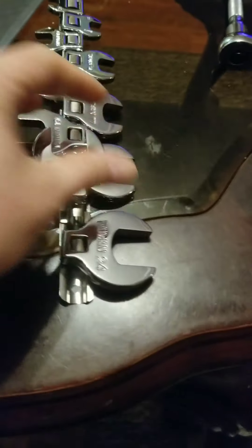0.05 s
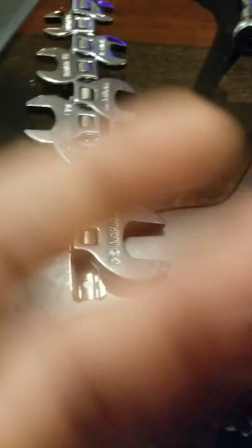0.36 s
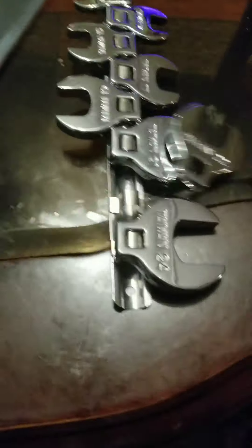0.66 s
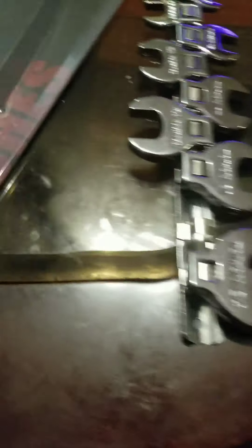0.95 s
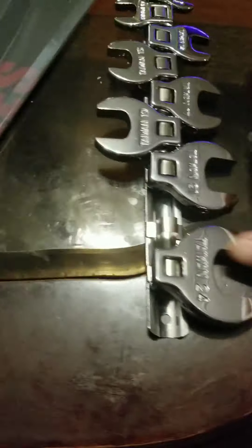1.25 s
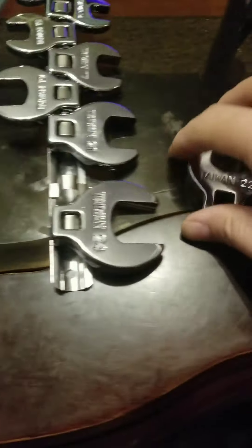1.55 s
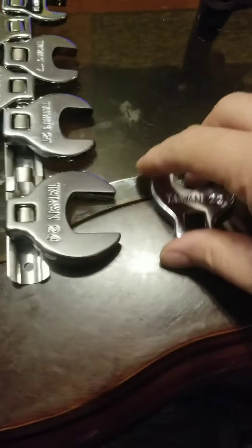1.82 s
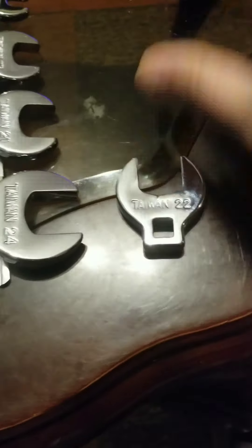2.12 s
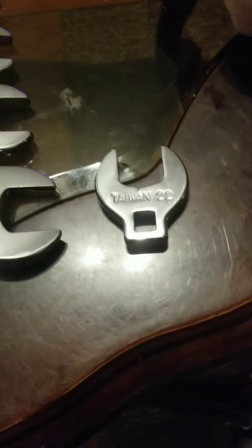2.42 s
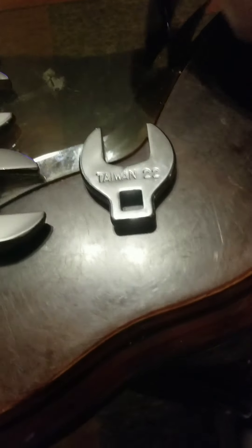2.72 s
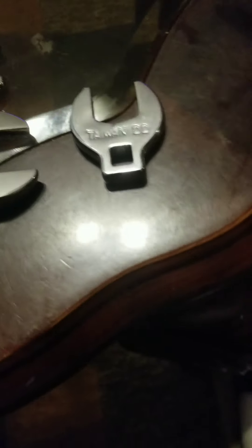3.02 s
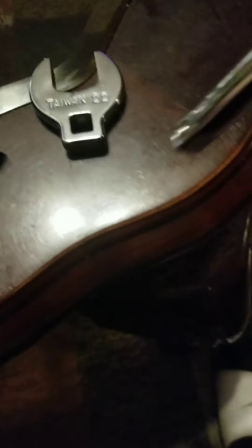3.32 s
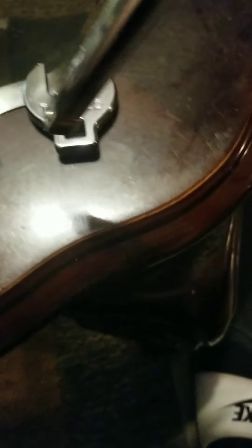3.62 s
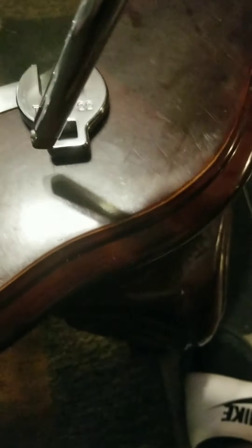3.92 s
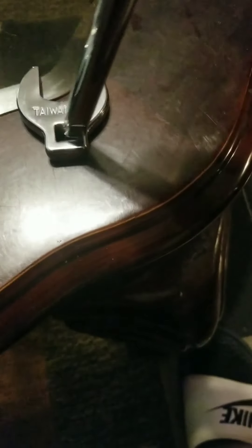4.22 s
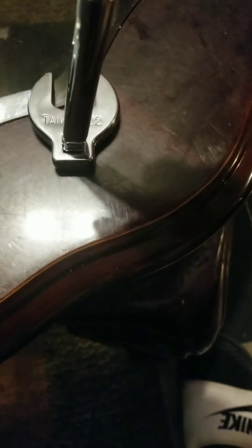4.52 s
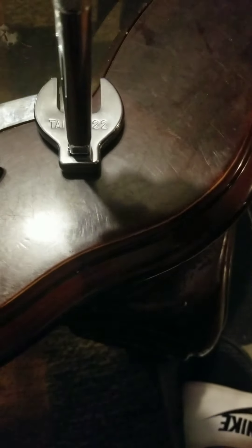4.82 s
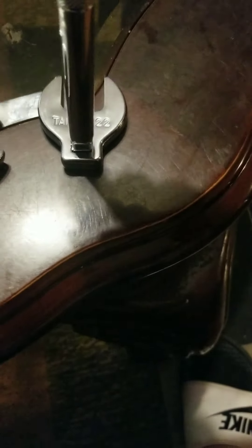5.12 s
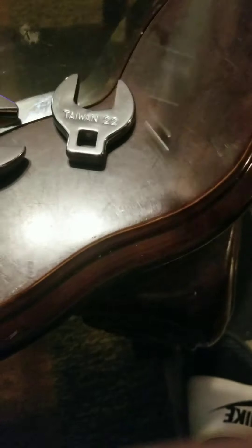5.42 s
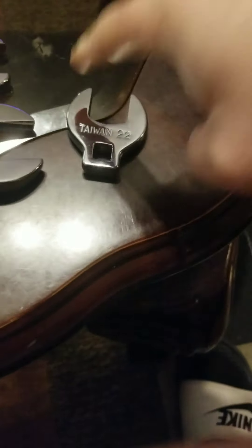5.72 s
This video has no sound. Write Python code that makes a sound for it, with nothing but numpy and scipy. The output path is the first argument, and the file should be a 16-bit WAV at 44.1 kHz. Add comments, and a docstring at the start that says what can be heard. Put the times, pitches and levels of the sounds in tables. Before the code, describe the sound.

A steel wrench clinks against others on a rack, then tumbles onto a wooden table with a quick, ringing clatter. Soft ticks follow as it is nudged into place. A drive handle meets its square hole with a cluster of sharp clacks and snaps, then comes out with two more clacks and a faint hiss. The sounds are close, in a small room with a short echo and a low hum.

```python
"""Steel crowfoot wrenches clink and clatter on a wooden table in a small room.
One clinks against the rack, tumbles onto the table and is nudged into place. A drive handle is
pushed into its square hole with sharp clacks, then pulled out with a faint hiss and squeak.
Hard hits shake steel and wood together and leave the steel ringing; light touches only tick.
The room adds a short echo, dull air noise and the low hum of a motor."""
import sys
import numpy as np
from scipy import signal
from scipy.fft import rfft, irfft, next_fast_len
from scipy.io import wavfile

SR = 44100
rng = np.random.default_rng(int(sys.argv[2]) if len(sys.argv) > 2 else 0)


def put_to_file(sound):
    """Save the sound as 16-bit audio at rate SR, in the file named by the first command-line argument."""
    columns = np.atleast_2d(sound).T  # one column per channel
    safe = np.clip(columns, -1, 1)
    whole_steps = np.round(safe * 32767)
    wavfile.write(sys.argv[1], SR, whole_steps.astype(np.int16))


N = 254016
TIME = np.arange(N) / SR
HIT_SAMPLES = 16384
HIT_TIME, HIT_HZ = np.arange(HIT_SAMPLES) / SR, np.fft.rfftfreq(HIT_SAMPLES, 1 / SR)
SIDES = np.array([[.5], [-.5]])   # splits a left-right difference between the ears


# wrench hits wrench: start_s, level_db, treble_db_per_octave, chatter_s, ring_db, neighbour_ring_db
CLINKS = [(.0045, -25, 1.5, .012, -19, -49.5), (.454, -49.5, -4, .007, -65.5, -70.5),
          (.5385, -37, -3.5, .004, -49.5, -52), (0.5473, -35.5, -.5, .01, -37, -36),
          (.570, -38.5, 9, .007, -41, -40.5)]
# tone of a clink, from bass to treble: pitch_hz, level_db
CLINK_TONE = [(100, -11), (300, -6), (1200, 0.5), (2200, -6.5), (5000, -12.5), (8800, -7.5), (10000, -3),
              (11000, -2.5), (12000, 7), (13000, -7), (14200, -11.5), (15600, -9.5)]
# pitches that stand out in loose steel: pitch_hz, width_hz, full_boost_db
LOOSE_STEEL = [(1066, 72, 3.5), (1560, 32, 5.5), (2210, 21, 8.5), (2380, 30, 8), (2890, 45, 10),
               (3560, 36, 10), (4410, 71, 11), (4670, 20, 5.5), (4760, 19, 2.5), (5530, 69, 9.5),
               (6360, 40, 7), (6400, 35, 5), (7540, 84, -0.5), (8540, 70, 5), (11000, 50, 6.5),
               (11810, 56, 5), (12900, 50, 5), (13200, 50, 7), (13340, 70, 2), (15100, 50, 5.5)]
# notes of the neighbouring wrench: pitch_hz, level_db, fade_s
NEIGHBOUR_NOTES = [(7460, -19.5, 0.17), (10500, -12, 0.29), (11850, 3.5, 0.15), (12350, -11, 0.095),
                   (14710, -4, .2), (15420, -15.5, .12)]

def clinks():
    """The wrench knocks against its neighbour on the rack, and both ring."""
    hits = steel_hits(CLINKS, CLINK_TONE, LOOSE_STEEL, boost_share=0.79, damping=0.95,
                      crack_db=-1.5, pan_db=-1.5, ring_pan_db=4.0, vary_db=0.5)
    return hits + pings([(s, ring_db) for s, *_, ring_db in CLINKS], NEIGHBOUR_NOTES)


# four bounces on the table: start_s, level_db, first_rattle_db
BOUNCES = [(.6773, -17.5, -27), (.7395, -19.5, -24), (.7906, -22, -29), (.8404, -24, -28.5)]
# tone of a bounce: pitch_hz, level_db
BOUNCE_TONE = [(80, -20), (250, -3), (420, -9), (700, -1.5), (1000, -2.5), (2000, -3.5), (4500, -2),
               (6500, -3), (8000, -5), (9000, -11), (12000, -9), (15000, -9), (16000, -19)]
# notes of the rack: pitch_hz, level_db, base_fade_s
RACK_NOTES = [(1502, -12, 0.11), (2250, -9.5, 0.2), (3410, -8.5, 0.12), (3500, -1.5, 0.11), (4270, -5, .16),
              (4800, -4.5, .17), (5400, -6, .22), (6530, -5, .18)]

def tumble(chatter_s=.018, rattle_gap_s=0.016, rattle_chatter_s=.013):
    """The wrench bounces, each time more briefly. A dying rattle follows each bounce."""
    touches = []
    for n, (s, db, rattle_db) in enumerate(BOUNCES):
        touches.append((s, db, 0.06 * n, chatter_s * .68 ** n))   # a little brighter each time
        for k in range(4):   # each rattle is 5 dB softer than the last
            touches.append((s + rattle_gap_s * (k + 1), rattle_db - 5 * k, 0.2, rattle_chatter_s))
    # the wrench rings 13 dB below each touch, its neighbour 21 dB below, the rack 15 dB below
    rows = [(s, db, treble, chatter, db - 13, db - 21) for s, db, treble, chatter in touches]
    hits = steel_hits(rows, BOUNCE_TONE, LOOSE_STEEL, boost_share=0.84, damping=1.3,
                      crack_db=-1.5, pan_db=0.5, ring_pan_db=2.5, vary_db=3.0)
    rack = pings([(s, db - 15) for s, db, *_ in rows], RACK_NOTES, damping=1.1)
    neighbour = pings([(s, ring_db) for s, *_, ring_db in rows], NEIGHBOUR_NOTES)
    return hits + rack + neighbour


# handle hits wrench: start_s, level_db, treble_db_per_octave, chatter_s, ring_db, handle_ring_db
CLACKS = [(4.2045, -19, 0.8, 0.014, -26.5, -37), (4.246, -26.5, 2.4, 0.0085, -43, -50),
          (4.3252, -20.5, 1.3, 0.012, -24, -26.5), (4.3485, -27.5, -3.5, 0.003, -48, -52),
          (4.366, -25.5, 0.5, 0.0017, -55, -58), (4.371, -22.5, 3, 0.0075, -45, -48),
          (4.396, -28, 1.5, 0.0053, -57, -50), (5.143, -22, 1.1, 0.019, -45, -35.5),
          (5.232, -28, 5, 0.0039, -40, -50)]
# tone of a clack: pitch_hz, level_db
CLACK_TONE = [(80, -9), (200, -11), (320, 4), (600, -1), (1500, -0.5), (2200, -9.5), (3500, -15.5),
              (5000, -18.5), (7000, -22.5), (10000, -30.5), (13000, -35), (16000, -70)]
# pitches that stand out in steel pressed on wood: pitch_hz, width_hz, full_boost_db
PRESSED_STEEL = [(375, 30, 3.7), (431, 43, 9), (757, 48, 7.5), (1000, 73, 5.2), (1173, 49, 8.9),
                 (1570, 78, 4), (2296, 120, 6.4), (2930, 130, 12.2), (3595, 59, 15.2), (4380, 72, 12.5),
                 (6500, 190, 0.94)]
# notes of the drive handle: pitch_hz, level_db, base_fade_s
HANDLE_NOTES = [(8580, -5, 0.2), (10880, -15, 0.19), (12500, -9, 0.1), (14400, -20, .08), (15400, -22, .1)]

def handle_clacks(crack_low_hz=5000):
    """The handle meets the square hole and rocks the wrench on the wood."""
    out = steel_hits(CLACKS, CLACK_TONE, PRESSED_STEEL, boost_share=1.0, damping=2.5,
                     crack_db=2.5, pan_db=0.8, ring_pan_db=14.5, vary_db=3.0)
    out += pings([(s, ring_db) for s, *_, ring_db in CLACKS], HANDLE_NOTES, damping=0.8)
    # bare steel on steel adds a short, bright crack that grows with the ringing
    treble = 1 / np.sqrt(1 + (crack_low_hz / (HIT_HZ + 20)) ** 4)
    for s, *_, ring_db, handle_ring_db in CLACKS:
        strength = from_db(ring_db - 27) + from_db(handle_ring_db - 9)
        add(out, s, strength * knock(treble, chatter_s=.0009, crack_db=0, vary_db=4.0))
    return out


# notes of the wrench being handled: pitch_hz, level_db, base_fade_s
WRENCH_NOTES = [(2890, -20, .2), (9860, -0.5, 0.22), (9670, -8.5, 0.045), (11930, -21.5, 0.13),
                (15340, -18, .14)]

def steel_hits(rows, tone, peaks, boost_share, damping, crack_db, pan_db, ring_pan_db, vary_db):
    """Each hit shakes steel and table together and leaves the wrench ringing. Positive pan is left."""
    out = np.zeros((2, N))
    body = tone_curve(tone, [(hz, width, db * boost_share) for hz, width, db in peaks], HIT_HZ)
    octaves = np.log2(np.maximum(HIT_HZ, 300) / 300)
    for s, db, treble_db, chatter_s, ring_db, _ in rows:
        thud = knock(body * from_db(treble_db * octaves), chatter_s, crack_db, vary_db)
        ring = ringing(WRENCH_NOTES, vary_db=0.0, damping=damping)
        add(out, s, from_db(db + pan_db * SIDES) * thud)
        add(out, s, from_db(ring_db + ring_pan_db * SIDES) * ring)
    return out


# snaps of the locking ball: start_s, level_db
SNAPS = [(4.326, -21), (4.3485, -23), (5.232, -22)]
# notes of a snap: pitch_hz, level_db, fade_s
SNAP_NOTES = [(3580, -1.5, 0.037), (5300, -8.5, 0.053), (5860, -3, 0.016), (6830, -12, 0.022),
              (7680, -11, 0.031)]

def ball_snaps():
    """The spring-loaded ball in the handle snaps and rings briefly."""
    return pings(SNAPS, SNAP_NOTES)


# light touches on the table: start_s, level_db, lowest_hz, highest_hz
NUDGES = [(1.362, -52, 2490, 5900), (1.3905, -44.5, 1700, 4000), (1.425, -44, 2100, 11900),
          (1.4875, -47.5, 2010, 14000), (1.512, -46, 507, 3560), (1.5415, -41, 396, 3700),
          (1.670, -44.5, 600, 13900), (2.487, -47.5, 700, 6800), (2.536, -51, 910, 5060),
          (2.589, -39.5, 1740, 11900), (2.654, -50, 500, 4500), (2.782, -54.5, 2000, 13000),
          (4.576, -40.5, 400, 2420)]
# tone of a light touch: pitch_hz, level_db
NUDGE_TONE = [(100, -23), (400, 8.5), (1000, 10.5), (1900, -2), (2800, 1), (4200, -5), (6000, -6.5),
              (9000, -12.5), (13000, -16), (16000, -16)]

def nudges(pan_db=-1.0, tick_hz=3680, tick_width_hz=160, tick_db=6, boost_share=0.28):
    """Fingers slide the wrench into place and stop it ringing, so it only ticks."""
    out = np.zeros((2, N))
    peaks = [(hz, width, db * boost_share) for hz, width, db in PRESSED_STEEL]
    body = tone_curve(NUDGE_TONE, [(tick_hz, tick_width_hz, tick_db)] + peaks, HIT_HZ)
    for s, db, low_hz, high_hz in NUDGES:
        band = 1 / np.sqrt((1 + (low_hz / (HIT_HZ + 20)) ** 4) * (1 + (HIT_HZ / high_hz) ** 8))
        tick = knock(body * band, chatter_s=0.0058, crack_db=-0.5, vary_db=1.0)
        add(out, s, from_db(db + pan_db * SIDES) * tick)
    return out


# tiny slips: start_s, level_db
SLIPS = [(2.968, -56), (2.993, -60), (5.592, -46)]
# notes of a squeak: pitch_hz, level_db, fade_s
SQUEAK_NOTES = [(6480, 7.5, .02), (6800, 1, .02), (6850, -8, .02)]

def squeaks():
    """Steel slips for an instant and gives a high squeak."""
    return pings(SLIPS, SQUEAK_NOTES)


# faint brushing strokes: middle_s, half_length_s, level_db
BRUSHES = [(5.45, 0.034, -50), (5.54, 0.022, -44), (5.556, 0.0085, -38.5)]

def brushing(low_hz=12000, body_db=-11):
    """A thin hiss as the handle is drawn away."""
    noise = rng.standard_normal((2, N))
    hiss = signal.sosfilt(signal.butter(2, low_hz, "high", fs=SR, output="sos"), noise)
    strokes = sum(from_db(db) * np.exp(-((TIME - s) / half_s) ** 2) for s, half_s, db in BRUSHES)
    return rms_one(hiss + from_db(body_db) * noise) * strokes


def pings(rows, notes, damping=1):
    """Ringing without a knock, once for each (start_s, level_db)."""
    out = np.zeros((2, N))
    for s, db in rows:
        add(out, s, from_db(db) * ringing(notes, vary_db=0.5, damping=damping))
    return out


def ringing(notes, vary_db, damping, detune=0.0034):
    """Steel rings. Each note falls 60 dB in its fade time divided by damping (pressure on the steel)."""
    out = np.zeros((2, HIT_SAMPLES))
    for hz, db, fade_s in notes:
        shifted_hz = hz * (1 + detune * rng.standard_normal())   # each touch bends the pitch a little
        phase = rng.uniform(0, 2 * np.pi) + np.pi / 2 * SIDES
        level_db = db + vary_db * rng.standard_normal((2, 1)) - 60 * HIT_TIME * damping / fade_s
        out += from_db(level_db) * np.sin(2 * np.pi * shifted_hz * HIT_TIME + phase)
    return out * (1 - np.exp(-HIT_TIME * SR / 10))


def contact_force(chatter_s, crack_db, crack_s=0.00041, uneven_db=1.5):
    """The push of a hit: a hard first crack, then a dying chatter of tiny, uneven bounces."""
    steps = np.arange(0, HIT_SAMPLES, SR // 1000)
    wobble = np.interp(np.arange(HIT_SAMPLES), steps, rng.standard_normal(len(steps)))
    bounces = from_db(uneven_db * wobble) * np.exp(-HIT_TIME / chatter_s)
    chatter = rms_one(rng.standard_normal((2, HIT_SAMPLES)) * bounces)
    crack = rms_one(rng.standard_normal((2, HIT_SAMPLES)) * np.exp(-HIT_TIME / crack_s))
    rise = 1 - np.exp(-HIT_TIME / 0.0015)   # the faces take a moment to meet fully
    return rms_one((chatter + from_db(crack_db) * crack) * rise) / np.sqrt(HIT_SAMPLES)


# how alike a hit is in both ears: pitch_hz, likeness (1 = the same, 0 = unrelated)
HIT_LIKENESS = [(150, 1), (400, 0.41), (1000, 0.044), (2500, 0.1), (6000, 0.062), (15000, 0.1)]

def knock(body, chatter_s, crack_db, vary_db, right_delay_s=0.000449):
    """A push shakes an object. Each spot struck favours other pitches; the left ear hears it first."""
    steps_hz = np.linspace(0, np.sqrt(SR / 2), 70) ** 2
    spot = from_db(vary_db * np.interp(HIT_HZ, steps_hz, rng.standard_normal(len(steps_hz))))
    delay = np.exp(2j * np.pi * HIT_HZ * right_delay_s * (SIDES - .5))
    force = two_ears(rfft(contact_force(chatter_s, crack_db)), HIT_LIKENESS, HIT_HZ) * delay
    fade = np.minimum(np.linspace(4, 0, HIT_SAMPLES), 1) ** 2
    sound = irfft(force * ring_after(body * spot)) * fade
    return rms_one(sound) * np.sqrt(.025 * SR / HIT_SAMPLES)   # as much energy as 25 ms at level 1


# time the echo takes to fall 60 dB: pitch_hz, fade_s
ECHO_FADE = [(150, 0.13), (1000, 0.36), (4000, 0.41), (8000, 0.33), (15000, 0.2)]
# strength of the echo: pitch_hz, level_db
ECHO_LEVEL = [(150, -8), (1000, -5.5), (4000, -7), (8000, -7.5), (15000, -10)]
# how alike echo and air noise are in both ears: pitch_hz, likeness
ROOM_LIKENESS = [(60, 0.93), (150, 0.92), (300, 1), (500, -0.13), (950, -0.14), (2400, 0.15), (6000, -0.38),
                 (15000, 0.96)]

def room_echo(sound, build_s=0.004):
    """Reflections build up quickly and die soonest in the bass and the highest treble."""
    t = np.arange(SR * 3 // 4) / SR
    edges_hz = 80 * 2 ** np.arange(9.0)
    tail = 0
    for low, high in zip(edges_hz, edges_hz[1:]):
        hz = np.sqrt(low * high)
        octave = signal.butter(2, [low, high], "band", fs=SR, output="sos")
        band = two_ears(signal.sosfilt(octave, rng.standard_normal((2, len(t)))), ROOM_LIKENESS, hz)
        fade = from_db(-60 * t / at_hz(ECHO_FADE, hz)) * (1 - np.exp(-(t / build_s) ** 2))
        tail += from_db(at_hz(ECHO_LEVEL, hz)) * band * fade / np.sqrt(np.sum(fade ** 2))
    return signal.fftconvolve(sound, tail, axes=1)[:, :N]


# rise and fall of the background: time_s, relative_level_db
BACKGROUND_SWELL = [(0.0, -39), (0.34, -46), (0.74, -42), (0.9, -52.5), (1.11, -55.5), (1.59, -52),
                    (1.92, -55.5), (2.39, -50.5), (2.95, -51), (3.26, -48), (3.51, -43.5), (4.3, -36.5),
                    (4.59, -40.5), (5.76, -39.5)]
# tone of the air noise: pitch_hz, level_db
AIR_TONE = [(20, -34), (40, -16.5), (55, -24), (80, -12), (114, -6.5), (160, -6), (256, -6.5), (400, -12),
            (545, -14.5), (700, -9), (1290, -22), (3000, -28.5), (7700, -36.5), (10100, -44), (16000, -39)]
# pitches the room colours: pitch_hz, width_hz, boost_db
ROOM_PEAKS = [(122, 17, 2.5), (227, 8.6, -0.5), (258.5, 19, 6.5), (321.7, 13, 10), (411, 42, 4)]

def background(hum_hz=58.4, hum_db=-8, gain_db=1.0, pan_db=-0.5):
    """Dull air noise and a motor's hum; both sink after the tumble and slowly swell again."""
    hz = np.fft.rfftfreq(N, 1 / SR)
    noise = two_ears(rfft(rng.standard_normal((2, N))), ROOM_LIKENESS, hz)
    air = rms_one(irfft(noise * tone_curve(AIR_TONE, ROOM_PEAKS, hz), N))
    hum = from_db(hum_db) * np.sqrt(2) * np.sin(2 * np.pi * hum_hz * TIME)
    swell_db = np.interp(TIME, *np.transpose(BACKGROUND_SWELL))
    return (air + hum) * from_db(gain_db + swell_db + pan_db * SIDES)


def from_db(db):
    return 10 ** (np.asarray(db) / 20)


def rms_one(x):
    return x / np.sqrt(np.mean(x ** 2) + 1e-20)


def at_hz(table, hz):
    """Read between the rows of a table, with every octave equally wide."""
    known_hz, values = np.transpose(table)
    return np.interp(np.log(np.maximum(hz, 1)), np.log(known_hz), values)


def add(out, start_s, sound):
    """Mix a sound in at its start time."""
    start = round(start_s * SR)
    out[:, start:start + sound.shape[1]] += sound[:, :N - start]


def tone_curve(tone, peaks, hz):
    """How strongly an object answers at each pitch: a broad tone with narrow peaks on top."""
    lift = sum((from_db(db) ** 2 - 1) / (1 + (2 * (hz - centre) / width) ** 2)
               for centre, width, db in peaks)
    return from_db(at_hz(tone, hz)) * np.sqrt(np.maximum(1 + lift, 0.1))


def ring_after(gain):
    """Turn a tone curve into a filter that rings only after the hit (minimum phase)."""
    log_gain = np.log(np.r_[gain, gain[-2:0:-1]])
    return np.exp(np.conj(signal.hilbert(log_gain)))[:len(gain)]


def two_ears(pair, likeness, hz):
    """Blend two unrelated noises into left and right."""
    alike = np.clip(at_hz(likeness, hz), -.99, .99)
    return (np.sqrt(1 + alike) * pair[0] + np.sqrt(1 - alike) * pair[1] * [[1], [-1]]) / np.sqrt(2)


def scene():
    """All the steel, its echo and the room's own noise."""
    steel = clinks() + tumble() + handle_clacks() + ball_snaps() + nudges() + squeaks() + brushing()
    return steel + room_echo(steel) + background()


# how much louder the left microphone is than the right: pitch_hz, difference_db
MIC_BALANCE = [(60, -1.5), (200, 0.5), (330, -5), (650, 3.5), (1200, 0.5), (4400, 0.5), (8000, 2.5),
               (15000, 6.5)]

def record(dry, cutoff_hz=15750):
    """The two microphones differ in tone; loud peaks are rounded and the highest treble is cut."""
    size = next_fast_len(N + HIT_SAMPLES)
    balance_db = at_hz(MIC_BALANCE, np.fft.rfftfreq(size, 1 / SR))
    heard = irfft(rfft(dry, size) * from_db(balance_db * SIDES), size)[:, :N]
    treble_cut = signal.ellip(10, .1, 90, cutoff_hz, fs=SR, output="sos")
    return signal.sosfilt(treble_cut, np.tanh(heard))


dry = scene()
out = record(dry)
put_to_file(out)
```